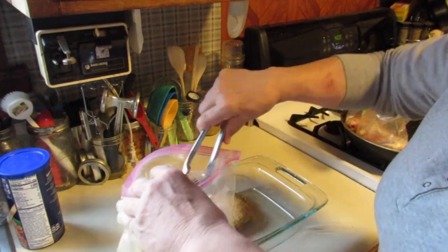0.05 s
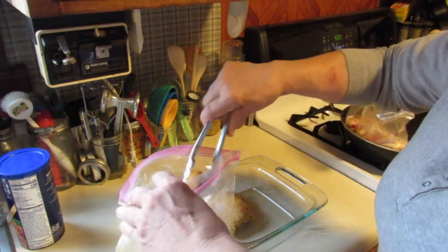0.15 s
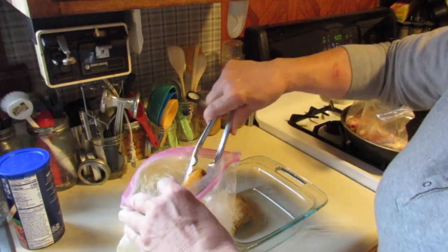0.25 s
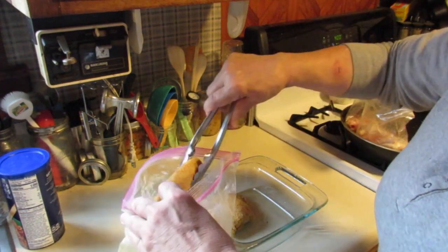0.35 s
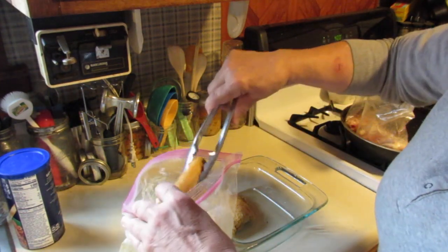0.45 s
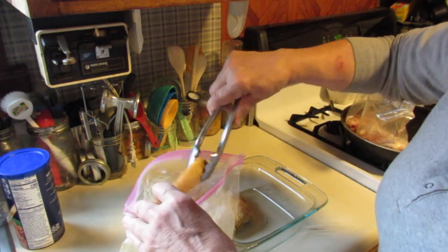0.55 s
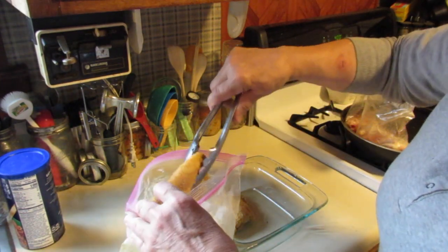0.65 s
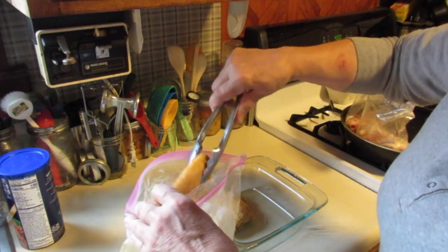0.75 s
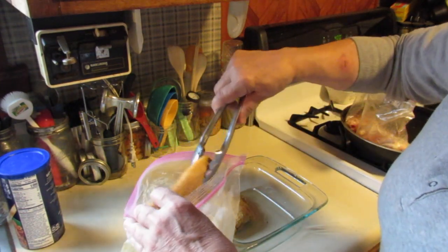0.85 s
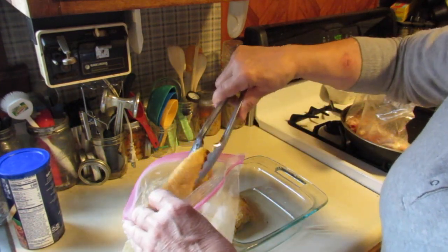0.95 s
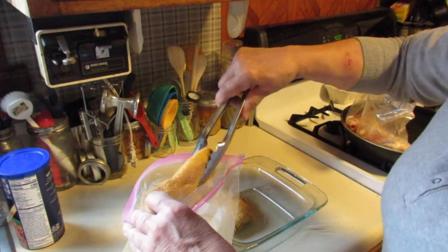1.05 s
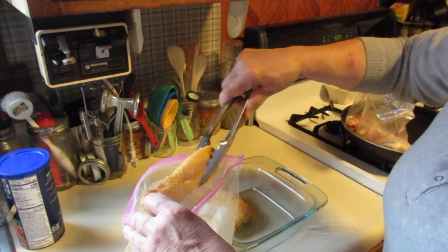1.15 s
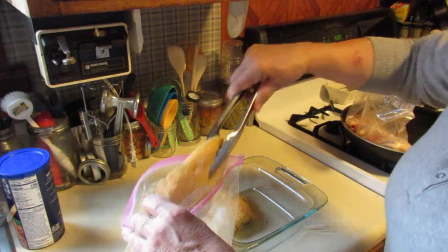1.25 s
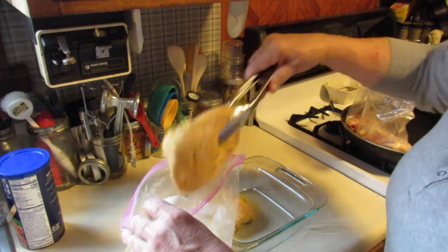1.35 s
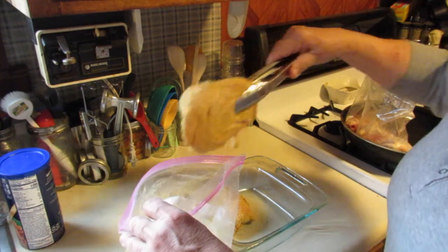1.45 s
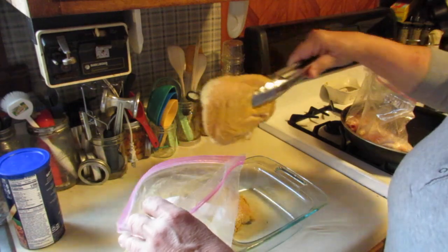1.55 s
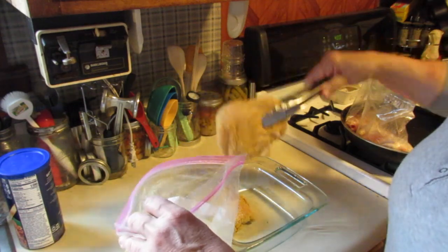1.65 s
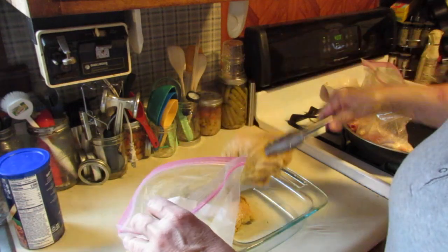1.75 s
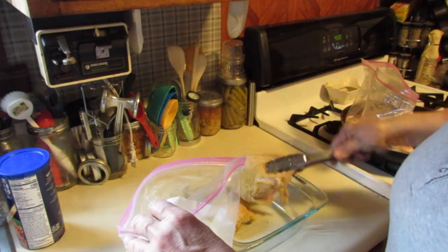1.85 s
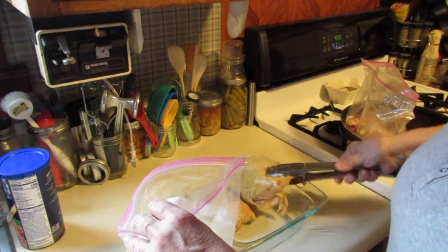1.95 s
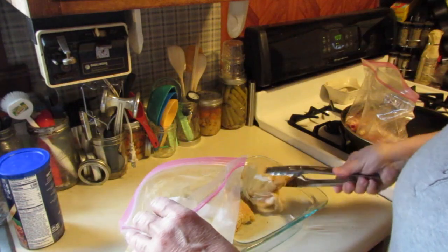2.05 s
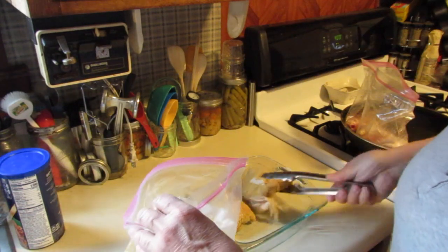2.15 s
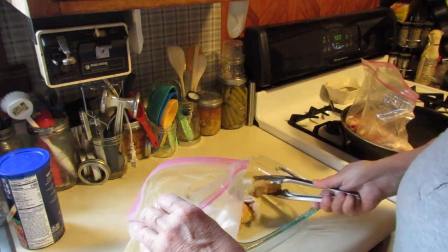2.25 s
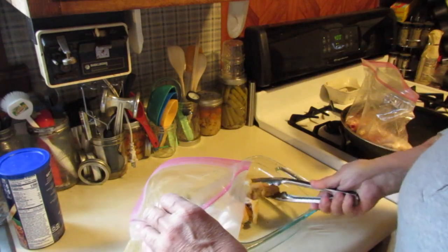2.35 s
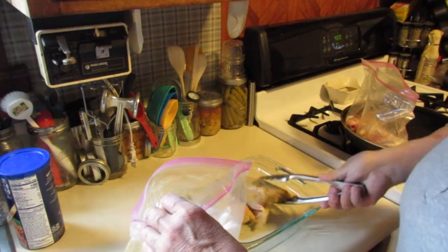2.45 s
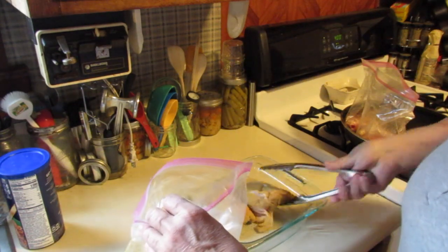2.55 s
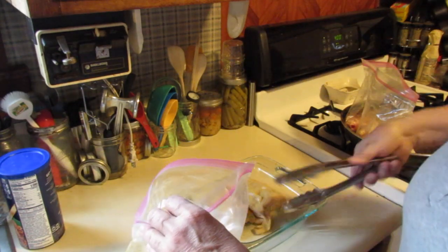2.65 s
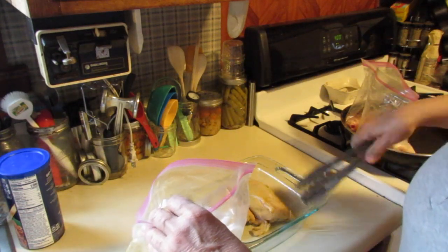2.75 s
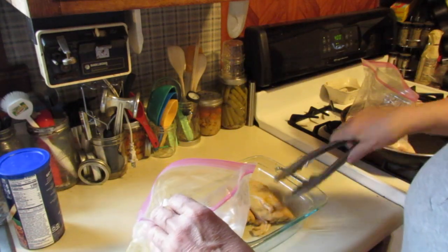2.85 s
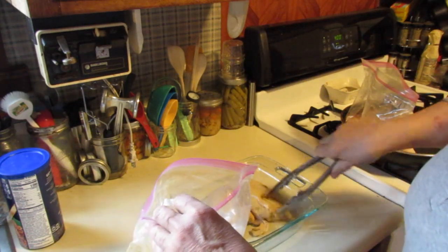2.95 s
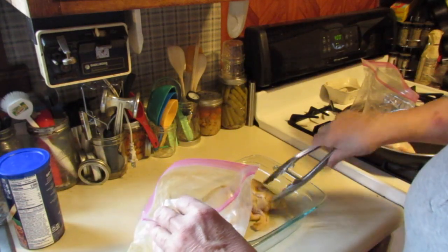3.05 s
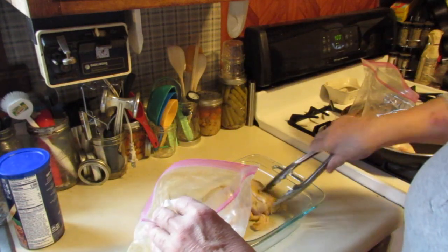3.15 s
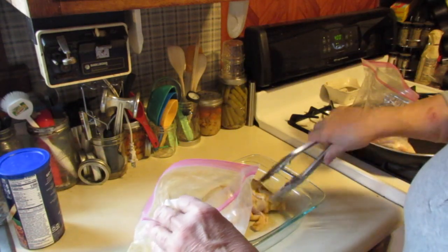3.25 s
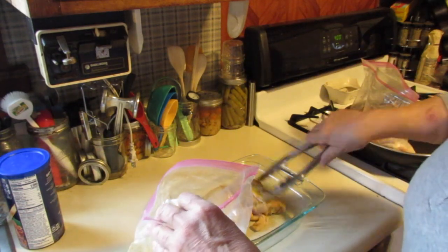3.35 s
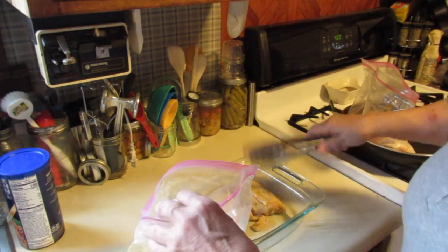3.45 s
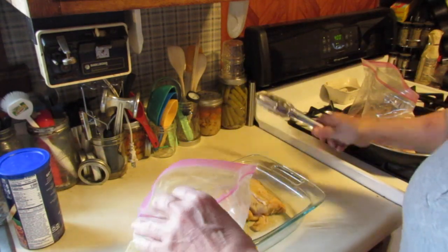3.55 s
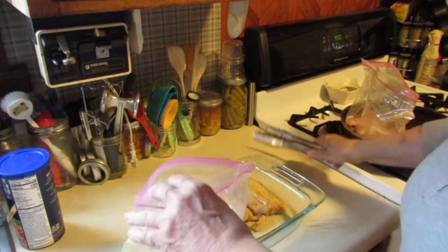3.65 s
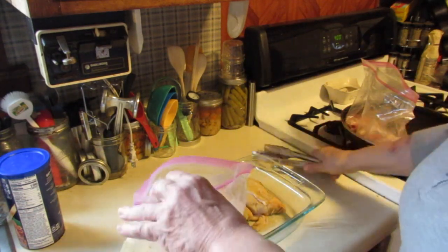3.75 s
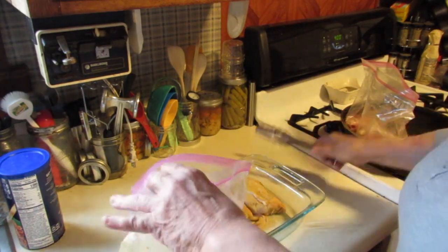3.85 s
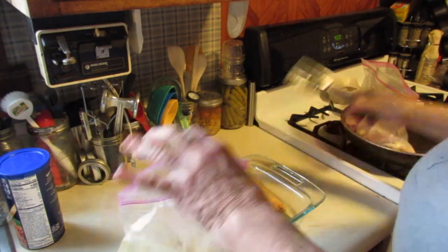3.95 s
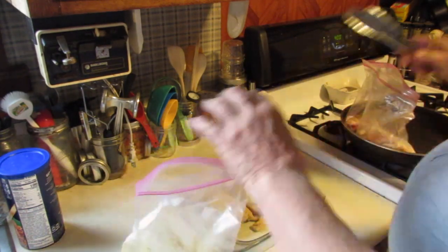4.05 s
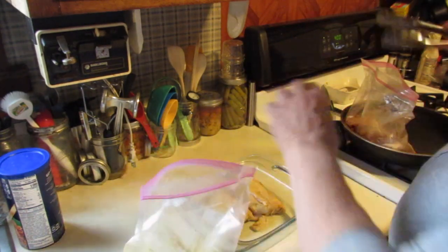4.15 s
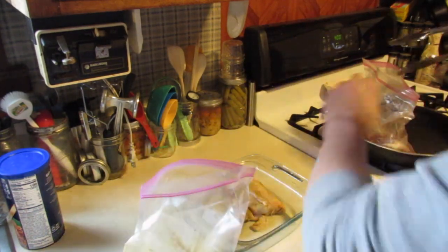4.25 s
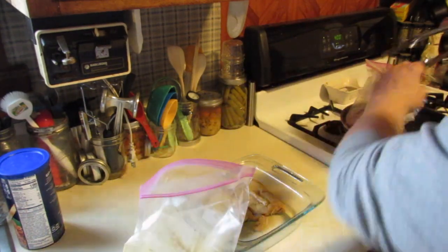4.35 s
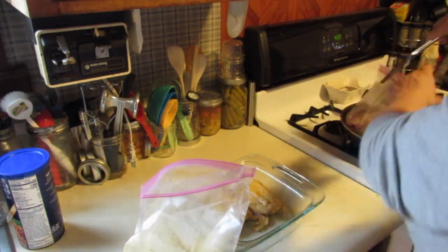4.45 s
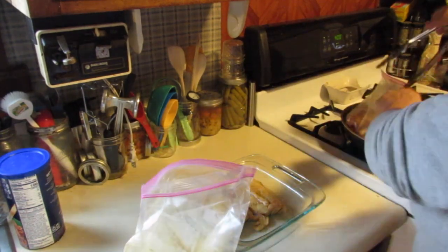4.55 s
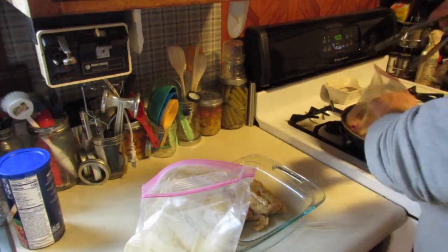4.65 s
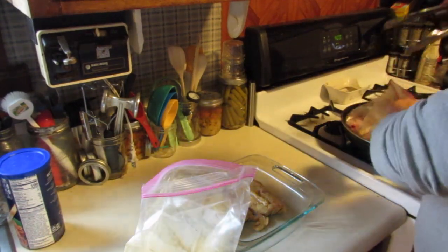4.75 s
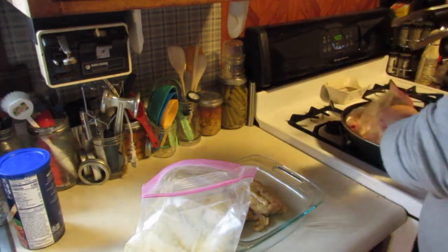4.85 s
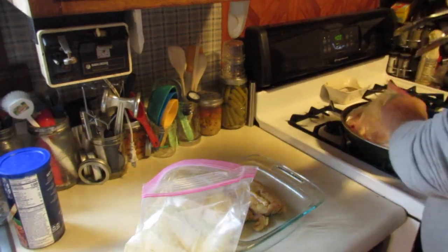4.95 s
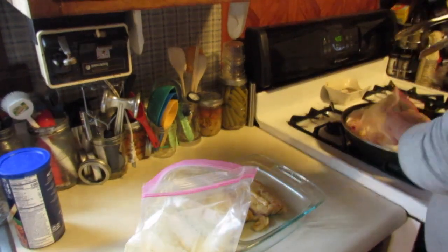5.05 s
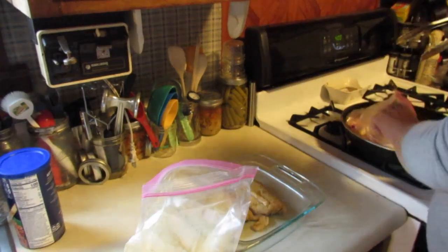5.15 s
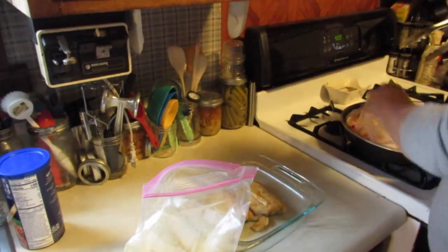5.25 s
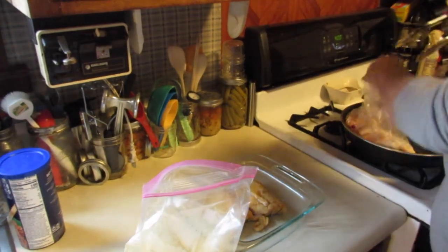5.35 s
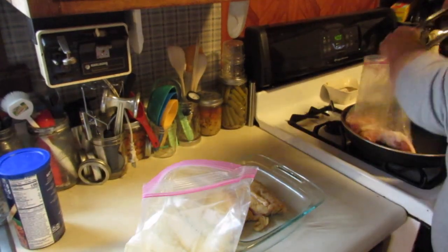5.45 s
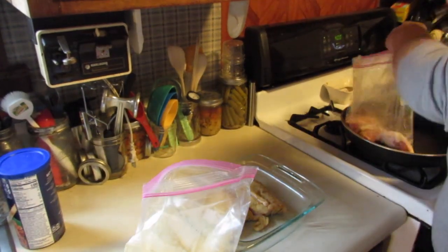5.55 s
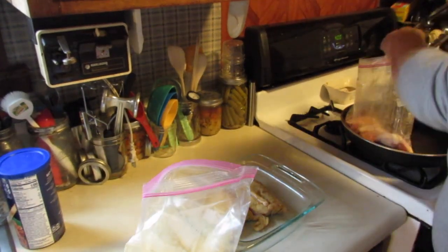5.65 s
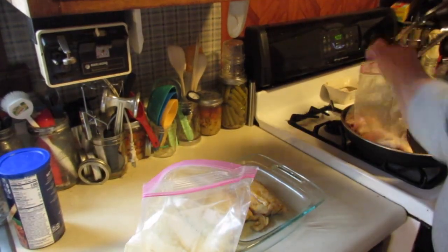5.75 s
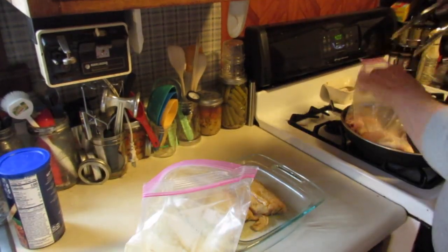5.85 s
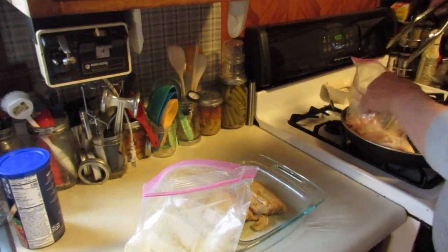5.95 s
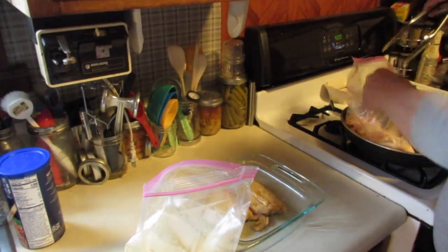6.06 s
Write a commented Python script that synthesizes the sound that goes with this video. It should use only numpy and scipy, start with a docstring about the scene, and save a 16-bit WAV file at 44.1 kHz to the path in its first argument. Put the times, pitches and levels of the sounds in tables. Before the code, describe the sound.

Faint film crackle, bright tong taps on glass, a last knock on the counter, then vigorous plastic bag crumpling over a low fridge hum.

```python
"""A plastic bag crinkles and settles as a hand slowly lets go of it, and steel tongs lay coated chicken in
a glass dish with a faint airy slide. The tongs rap the rim and drop on the counter; hands then work a second bag.
Bags are clumps of tiny clicks, plus noise puffs for snaps and bumps; tongs, glass and counter are dying sines.
A fridge hums as wandering sines over steady noise, and sparse reflections make the small, hard kitchen.
The camera has two close microphone ports and a narrow notch in its response."""
import sys
import numpy as np
from scipy import signal
from scipy.fft import rfft, irfft, next_fast_len
from scipy.io import wavfile
from scipy.ndimage import uniform_filter1d

SR = 44100
rng = np.random.default_rng(int(sys.argv[2]) if len(sys.argv) > 2 else 0)


def linear_from_db(decibels):
    """Turn decibels (scalar or array-like) into linear amplitude factors; 0 gives 1."""
    return 10 ** (np.asarray(decibels, float) / 20)


def int16_out(signal):
    """Quantize to a 16-bit WAV file."""
    q = np.round(np.clip(np.atleast_2d(signal).T, -1, 1) * 32767)
    wavfile.write(sys.argv[1], SR, q.astype(np.int16))


N = 268569  # length of the scene in samples


def evened(x):
    """Scales a sound to an rms of 1."""
    return x / np.sqrt(np.mean(x ** 2) + 1e-20)


def read(points, hz):
    """Reads a table of frequency and value, in straight lines on a log-frequency axis."""
    f, value = np.transpose(points)
    return np.interp(np.log(hz + 1), np.log(f + 1), value)


def add(mix, start_s, sound):
    """Mixes a sound in from the given second, cut off where the mix ends."""
    part = mix[round(start_s * SR):][:len(sound)]
    part += sound[:len(part)]


def colour(x, db_at):
    """Filters a sound by a gain in dB given as a function of frequency."""
    length = x.shape[-1]
    size = next_fast_len(length + 4096)
    gain = linear_from_db(db_at(np.fft.rfftfreq(size, 1 / SR)))
    return irfft(rfft(x, size) * gain, size)[..., :length]


def burst(centre_hz, decay_s, octave_db):
    """A noise puff that starts almost at once and dies away, weaker on both sides of its centre pitch."""
    t = np.arange(4096) / SR
    noise = rng.standard_normal(4096)
    noise = colour(noise, lambda f: -octave_db * np.log2((f + 1) / centre_hz) ** 2)
    rise = 1 - np.exp(-t / 0.0001)
    return evened(noise) * np.exp(-t / decay_s) * rise


def ring(modes, favoured_hz, octave_db, blur_hz):
    """Dying sines of one struck object, weaker away from the favoured pitch; rattling contact blurs them."""
    t = np.arange(SR // 3) / SR
    hz, db, t60 = np.transpose(modes)[..., None]
    db = db - octave_db * np.log2(hz / favoured_hz) ** 2
    # a random walk of the phase widens each pure tone
    slips = rng.standard_normal((len(modes), len(t))).cumsum(1)
    slips *= np.sqrt(2 * np.pi * blur_hz / SR)
    sines = np.sin(2 * np.pi * hz * t + slips)
    fading = linear_from_db(db - 60 * t / t60)
    rise = 1 - np.exp(-t / 0.00015)
    muffled = np.exp(-(t / 0.22) ** 6)  # every ring is cut short around 0.22 s
    return (fading * sines).sum(0) * rise * muffled


# Taut film crinkling. Each row: frequency in Hz, relative level in dB.
CRINKLE_COLOUR = [(1200, -45), (2500, 0.5), (4000, -1), (7000, -1.5), (10000, -3.5), (15000, -12)]
# Large folds flipping over. Each row: frequency in Hz, relative level in dB.
FOLDS_COLOUR = [(400, -23.5), (900, -2.5), (1700, -1.5), (2600, -7.5), (4000, -27)]
# Contents of the bag slumping. Each row: frequency in Hz, relative level in dB.
LOAD_COLOUR = [(40, -2), (80, -7), (200, -1), (450, 1.5), (900, -39)]
# Single snaps of film and light touches.
# Each row: start in seconds, relative level in dB, centre in Hz, decay time in seconds.
FILM_SNAPS = [(0.042, -27, 7200, 0.0072), (0.195, -23.5, 2500, 0.0024), (0.259, -35, 1800, .002),
              (0.359, -28.5, 2150, 0.0063), (0.599, -34, 5300, 0.0091), (0.657, -41, 3000, .01),
              (0.713, -31, 2400, 0.0028), (1.332, -35.5, 9000, 0.01), (1.384, -31, 2000, 0.0088),
              (1.64, -40, 3100, 0.0046), (2.151, -41.5, 5950, 0.011), (2.251, -34.5, 4900, 0.012),
              (2.348, -34, 9050, 0.012), (3.426, -44, 7350, 0.033), (3.935, -40, 6350, 0.011),
              (4.287, -33.5, 2040, 0.0097), (4.441, -25, 2050, 0.0097), (4.54, -29, 1500, 0.02),
              (4.83, -39, 5400, 0.022), (4.856, -32, 6000, .006), (4.885, -31, 5500, .007),
              (5.035, -33, 2300, 0.0046), (5.135, -28, 6500, 0.0067), (5.258, -30, 4130, 0.0097),
              (5.376, -22, 2030, 0.011), (5.436, -23.5, 1850, 0.018), (5.72, -35, 3500, 0.013),
              (5.790, -29, 7600, 0.0092), (5.88, -27.5, 5460, 0.0076), (6.058, -26.5, 7100, 0.0072)]
# Dull bumps of the loaded bag on the pan.
# Each row: start in seconds, relative level in dB, centre in Hz, decay time in seconds.
BAG_BUMPS = [(4.517, -21.5, 394, 0.054), (4.546, -28, 70, 0.037), (5.017, -19, 97, 0.022),
             (5.373, -22, 254, 0.014)]


def bag():
    """Creases in the film buckle as dense clicks of uneven size, in clumps, as hard as the hand works it."""
    out = np.zeros(N)
    clumps = linear_from_db(1.65 * evened(uniform_filter1d(rng.standard_normal(N), 160)))
    crinkle, folds = handling()
    load = crinkle * linear_from_db(-5)
    layers = ((CRINKLE_COLOUR, 11000, crinkle), (FOLDS_COLOUR, 3000, folds), (LOAD_COLOUR, 800, load))
    for shape, clicks_per_s, level in layers:
        happens = rng.random(N) < clicks_per_s / SR
        boost_db = 1.3 * np.minimum(rng.exponential(1, N), 4)
        clicks = happens * rng.standard_normal(N) * linear_from_db(boost_db)
        out += level * evened(colour(clicks * clumps, lambda f: read(shape, f)))
    for puffs, octave_db in ((FILM_SNAPS, 5.2), (BAG_BUMPS, 5.4)):
        for start, db, hz, decay in puffs:
            add(out, start, linear_from_db(db) * burst(hz, decay, octave_db) / 2)
    return out


# The hand slowly lets go of the first bag.
# Each row: time in seconds, relative crinkle level in dB, folds over crinkle in dB.
LETTING_GO = [(0, -47.5, 1.5), (.35, -51, -2), (.52, -53.5, -0.5), (.67, -52, -1), (.89, -57, 0.5),
              (1.08, -59, 5), (1.29, -56, 3), (1.62, -60.5, -13), (1.74, -84, -2)]
# Each grip or tug swells, holds and dies away. Each row: start in seconds, relative crinkle level in dB,
# swell in seconds, hold in seconds, folds over crinkle in dB.
GRIPS_AND_TUGS = [(0.023, -48, 0.011, 0.0091, -10), (0.28, -46.5, 0.011, .01, 0),
                  (0.89, -55.5, .01, 0.11, -16), (1.292, -47.5, 0.032, 0.063, -1.5),
                  (1.368, -47.5, 0.018, 0.0069, 2.5), (1.552, -54.5, 0.019, 0.03, 1),
                  (3.038, -56.5, .03, 0.086, -18), (3.26, -49, 0.02, 0.027, -8),
                  (3.893, -49, 0.027, 0.011, 0.5), (4.038, -47, 0.015, 0.0081, 2.5),
                  (4.17, -59, .015, .01, -5), (4.28, -53, 0.007, 0.1, 2), (4.428, -38.5, 0.011, 0.023, 0),
                  (4.515, -33, 0.0036, 0.045, -1.5), (4.696, -49, 0.036, 0.023, 4),
                  (4.821, -43.5, 0.0094, 0.066, -1), (4.921, -37, 0.09, 0.064, -0.5),
                  (5.023, -38.5, 0.082, 0.082, -2.5), (5.241, -41.5, 0.013, 0.0085, -1),
                  (5.298, -36.5, 0.063, 0.029, 0), (5.406, -31.5, 0.037, 0.052, 0),
                  (5.62, -50, 0.023, .01, 7.5), (5.716, -46.5, 0.019, .02, 1),
                  (5.778, -43, 0.011, 0.083, -1), (5.97, -47, 0.017, 0.022, 1.5),
                  (6.045, -43, 0.01, .005, 0)]


def handling():
    """Levels of crinkle and folds over time: the powers of the slow hold and of all grips add up."""
    swell_db, fall_db_per_s = 13, 205  # depth of a swell, and how fast the film settles
    t = np.arange(N) / SR
    times, db, folds_db = np.transpose(LETTING_GO)
    held = np.interp(t, times, db, right=-120)
    held_folds = held + np.interp(t, times, folds_db)
    power = linear_from_db(2 * np.array([held, held_folds]))
    for start, db, swell, hold, folds_db in GRIPS_AND_TUGS:
        swell = swell + 0.00073  # even the quickest grip takes a moment
        rising = swell_db * np.minimum((t - start) / swell - 1, 0)
        falling = fall_db_per_s * np.maximum(t - start - swell - hold, 0)
        power += linear_from_db(2 * (db + rising - falling)) * linear_from_db([[0], [2 * folds_db]])
    return np.sqrt(power)


# Blows of the tongs; where they land favours some pitches.
# Each row: start in seconds, relative crack level in dB, relative steel level in dB, favoured pitch in Hz.
TONG_BLOWS = [(2.515, -16, -20, 6700), (2.609, -30.5, -42, 5870), (2.7358, -24.5, -34.5, 6040),
              (2.757, -20.5, -33, 9400), (2.765, -31, -29.5, 4600), (2.777, -27, -32.5, 7900),
              (2.787, -21.5, -29.5, 8900), (2.9516, -21, -23.5, 7100), (2.956, -18.5, -28, 7250),
              (3.192, -16, -29.5, 4540), (3.197, -19.5, -24, 8100), (3.316, -36, -42.5, 8750),
              (3.788, -16.5, -22, 3790), (3.790, -31, -21.5, 9600)]
# Steel on a hard edge. Each row: frequency in Hz, relative level in dB.
CRACK_COLOUR = [(300, -8), (1200, 1.5), (3000, -2), (5300, -5), (7000, 0.5), (11000, -2.5), (13000, -3.5),
                (15000, -8)]
# Tones of the steel. Each row: frequency in Hz, relative level in dB, time to fall by 60 dB in seconds.
STEEL_MODES = [(3180, 8, 0.051), (4260, -12, 0.049), (4780, 1, 0.14), (5400, -1, 0.027), (5620, -1, 0.035),
               (6400, -14, .25), (6290, 6, 0.032), (6795, 3, 0.058), (7450, -0.5, 0.07),
               (7470, -13.5, 0.32), (7710, -3, 0.1), (7950, -6, 0.075), (8100, -0.5, 0.06),
               (8190, 3, 0.063), (8870, 0, 0.073), (9600, 2.5, 0.052), (10380, 3.5, .05), (10600, 5, 0.067),
               (11400, 5.5, 0.033)]
# Knocks that sound the counter's tones; the first, at 2.318 s, is the chicken thudding into the dish. # Each
# row: start in seconds, relative level in dB, favoured pitch in Hz.
COUNTER_KNOCKS = [(2.318, -32, 377), (2.515, -27, 890), (2.61, -40, 1300), (2.7352, -30, 2040),
                  (2.757, -40, 440), (2.778, -33, 436), (2.956, -24, 513), (3.192, -25.5, 850),
                  (3.198, -27.5, 426), (3.788, -21, 620), (3.7886, -21.5, 1620)]
# Tones of the counter. Each row: frequency in Hz, relative level in dB, time to fall by 60 dB in seconds.
COUNTER_MODES = [(256.7, 3, 0.16), (369.6, 2.5, 0.17), (436, 5.5, 0.16), (603, 5.5, 0.044),
                 (857, 1.5, 0.061), (1035, 1.5, 0.09), (1210, 5, 0.098), (1289, 2, 0.12), (1494, 1, 0.097),
                 (1677, 0, 0.09), (1850, -2, 0.062), (1930, 4, 0.024)]
# Contacts that ring the glass. Each row: start in seconds, relative level in dB, favoured pitch in Hz.
RIM_RAPS = [(2.515, -27, 2100), (2.612, -39.5, 1500), (2.7363, -21.5, 1510), (2.758, -30, 2500),
            (2.778, -31.5, 3920), (2.780, -28, 2150), (2.956, -23.5, 1400), (2.956, -24, 2930),
            (3.193, -19, 1400), (3.197, -18, 2770)]
# Tones of the glass dish. Each row: frequency in Hz, relative level in dB, time to fall by 60 dB in seconds.
GLASS_MODES = [(1344, 0.5, 0.22), (1353, -8.5, 0.9), (2135, -9, .12), (2345, -5.5, 0.13), (2590, -7, 0.14),
               (3200, -7.5, 0.059), (3510, 0, 0.048), (3965, -4, 0.18), (4160, -11, .25)]


def tongs():
    """Each blow cracks and rings the steel; most also ring the glass or the counter."""
    crack, rings, glass = np.zeros((3, N))
    for start, crack_db, steel_db, hz in TONG_BLOWS:
        rattle = burst(hz, 0.0096, 0.7)
        first_tick = 1.6 * burst(hz, 0.00074, 0.3)
        add(crack, start, linear_from_db(crack_db) * (rattle + first_tick))
        add(rings, start, linear_from_db(steel_db) * ring(STEEL_MODES, hz, 47, 41))
    for start, db, hz in COUNTER_KNOCKS:
        add(rings, start, linear_from_db(db) * ring(COUNTER_MODES, hz, 7.5, 29))
    for start, db, hz in RIM_RAPS:
        add(glass, start, linear_from_db(db) * ring(GLASS_MODES, hz, 26, 1))
    crack = colour(crack, lambda f: read(CRACK_COLOUR, f))
    heard = kitchen(crack, -0.53, 0.5) + kitchen(rings, -6.0, -1.6)
    heard += kitchen(glass, -20, 6)  # the glass ring is kept nearly dry in the sum, so its level stays even
    # keep the bass out of the blows: four gentle high-pass filters in a row
    no_bass = np.tile(signal.butter(1, 180, "high", fs=SR, output="sos"), (4, 1))
    return signal.sosfilt(no_bass, heard)


# Faint airy sounds, the first high ones as the chicken slides onto the glass.
# Each row: start in seconds, length in seconds, centre in Hz, width in Hz, relative level in dB.
AIRY_SOUNDS = [(1.087, 0.18, 1622, 50, -57), (1.77, 0.34, 3200, 260, -69), (1.817, 0.45, 3940, 260, -67.5),
               (1.901, 0.61, 3060, 2220, -61), (3.919, 0.36, 1790, 160, -58)]


def airy():
    """Noise in one resonance that fades in and out, wavering in strength."""
    out = np.zeros(N)
    t = np.arange(SR) / SR
    for start, length, hz, width, db in AIRY_SOUNDS:
        noise = rng.standard_normal(SR)
        noise = colour(noise, lambda f: -20 * np.log10(1 + (2 * (f - hz) / width) ** 2))
        arch = np.sin(np.pi * np.minimum(t / length, 1))
        waver = linear_from_db(3.2 * evened(uniform_filter1d(rng.standard_normal(SR), 1500)))
        add(out, start, linear_from_db(db) * evened(noise) * waver * np.sqrt(abs(arch)))
    return out


# How long the kitchen echoes. Each row: frequency in Hz, time to fall by 60 dB in seconds.
KITCHEN_DECAY = [(300, 0.22), (1000, 0.23), (3000, 0.24), (8000, 0.22), (14000, 0.19)]


def kitchen(x, wet_db, apart_db):
    """Sparse reflections of random sign, each band dying at its own speed; direct sound only in the sum."""
    taps = np.zeros((2, SR // 2))
    # one reflection at a random place in every 20 samples
    slots = np.arange(120, SR // 2 - 20, 20)
    at = slots + rng.integers(0, 20, (2, len(slots)))
    np.put_along_axis(taps, at, rng.choice([-1., 1.], at.shape), 1)
    hz, t, z = signal.stft(taps, SR, nperseg=256)
    fading = linear_from_db(-60 * t / read(KITCHEN_DECAY, hz)[:, None])
    tail = signal.istft(z * fading, SR, nperseg=256)[1]
    tail = tail / np.linalg.norm(tail[0])
    wet = signal.fftconvolve(x[None], tail, axes=1)[:, :N]
    return np.array([x + linear_from_db(wet_db) * wet[0], linear_from_db(apart_db) * wet[1]])


# Compressor of the fridge. Each row: frequency in Hz, relative level in dB, width in Hz.
FRIDGE_HUM = [(55.7, -51, 4.2), (219, -60, 43)]


def fridge():
    """Each hum line is a sine whose level and phase wander, weaker in the difference of the ports."""
    out, t = np.zeros((2, N)), np.arange(N) / SR
    for hz, db, width in FRIDGE_HUM:
        r = np.exp(-np.pi * width / SR)
        noise = rng.standard_normal((2, N)) + 1j * rng.standard_normal((2, N))
        wander = signal.lfilter([1], np.poly([r, r]), noise)
        wander = wander / np.sqrt(np.mean(abs(wander) ** 2))
        carrier = np.exp(2j * np.pi * hz * t)
        out += linear_from_db(db) * evened(((1.8 + wander) * carrier).real)  # 1.8 is the steady part
    return out * [[1], [0.25]]


# Distant house noise and microphone hiss. Each row: frequency in Hz, relative level per Hz in dB.
AIR_COLOUR = [(36, -40), (48, 7.5), (85, -5), (130, 0), (190, 4), (320, -1.5), (500, -8.5), (1000, -14),
              (1600, -17.5), (2200, -23), (4000, -30.5), (8000, -32), (13000, -35.5), (15000, -41)]


def air():
    """Steady noise with drifting patches, as sum and difference of the ports."""
    frames = N // 256 + 5
    patches = rng.standard_normal((frames, 513)).T
    patches = uniform_filter1d(patches, 12, 0)  # smooth over frequency
    patches = evened(uniform_filter1d(patches, 14, 1))  # smooth over time
    real, imaginary = rng.standard_normal((frames, 513, 2, 2)).T
    z = (real + 1j * imaginary) * linear_from_db(0.71 * patches)
    noise = signal.istft(z, nperseg=1024, noverlap=768)[1][:, :N]
    return linear_from_db(-45) * evened(colour(noise, lambda f: read(AIR_COLOUR, f)))


# Filter on the difference of the ports for near sources. Each row: frequency in Hz, gain in dB.
NEAR_SPREAD = [(60, -9), (130, -13), (290, -18), (640, -21), (1410, -20.5), (2600, -36), (6820, -13),
               (15000, 0.5)]
# The same filter for the air. Each row: frequency in Hz, gain in dB.
FAR_SPREAD = [(45, -10), (75, 4.5), (200, -3.5), (500, -0.5), (1300, -6), (2400, -9.5), (4400, -6),
              (8000, -1.5), (15000, -2)]


def scene():
    """Adds up the sum and difference signals of all sources and turns them into left and right."""
    soft = linear_from_db(-2.0) * bag() + airy()
    near = tongs() + kitchen(soft, -7, 0.51)
    far, hum = air(), fridge()
    total = near[0] + far[0] + hum[0]
    near_difference = colour(near[1], lambda f: read(NEAR_SPREAD, f))
    far_difference = colour(far[1], lambda f: read(FAR_SPREAD, f))
    difference = near_difference + far_difference + hum[1]
    balance_db = [[-0.2], [0.2]]  # left, right
    return np.array([total + difference, total - difference]) * linear_from_db(balance_db)


def top_cut(x):
    """Nothing passes above the cut-off."""
    return signal.sosfilt(signal.butter(12, 16240, fs=SR, output="sos"), x)


# Narrow dip in the response of the camera. Its values: centre in Hz, half width in Hz, depth in dB.
CAMERA_NOTCH = (684.4, 84, -10.5)
# Band limits of the finished sound, with a low cut and a steep edge near 15 kHz.
# Each row: frequency in Hz, gain in dB.
BAND_LIMITS = [(20, -30), (48, 0), (14900, 0), (15250, -28), (16000, -42)]


def record(dry):
    """The camera's notch dips a narrow band; a low cut and a steep edge near 15 kHz limit the finished sound."""
    hz, half_width, db = CAMERA_NOTCH

    def notch_and_limits(f):
        notch = db * np.exp(-((f - hz) / half_width) ** 4)
        return notch + read(BAND_LIMITS, f)

    heard = colour(dry, notch_and_limits)
    return top_cut(heard)


dry = scene()
out = record(dry)
int16_out(out)
```